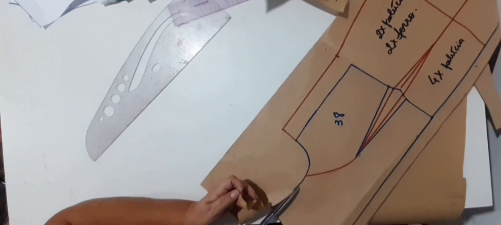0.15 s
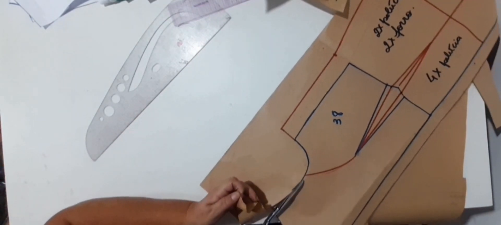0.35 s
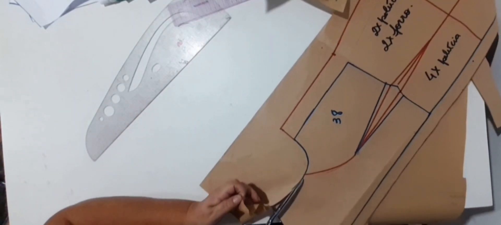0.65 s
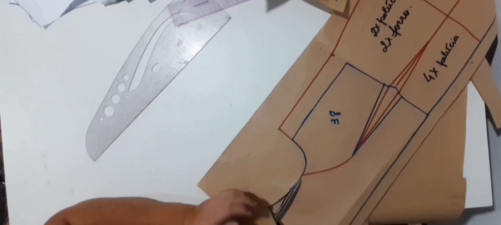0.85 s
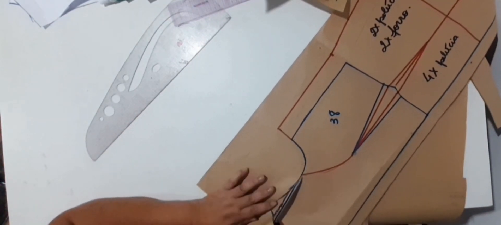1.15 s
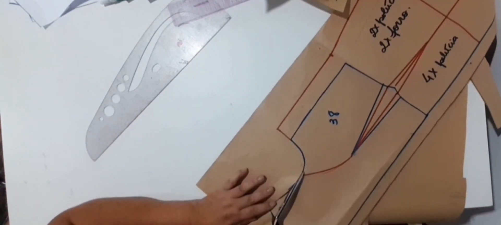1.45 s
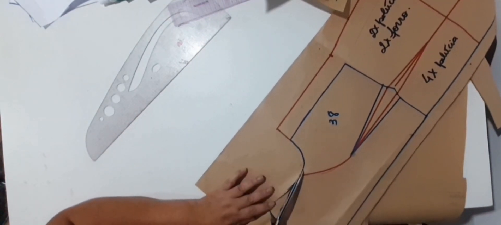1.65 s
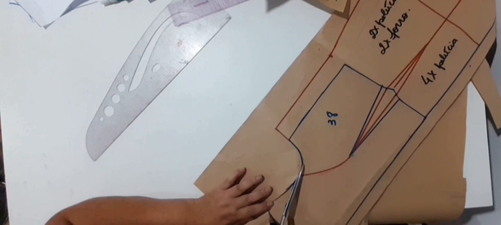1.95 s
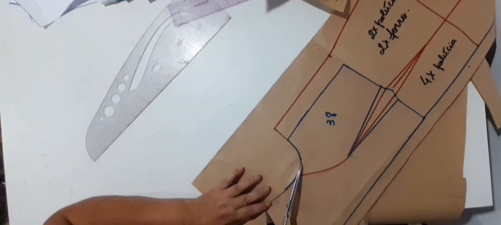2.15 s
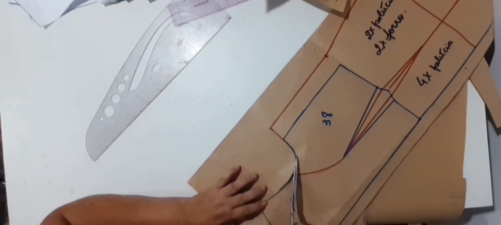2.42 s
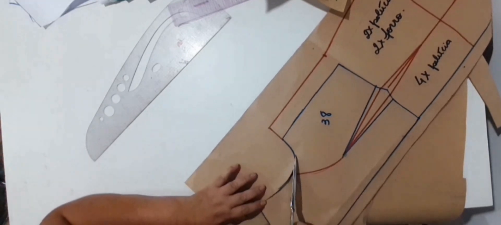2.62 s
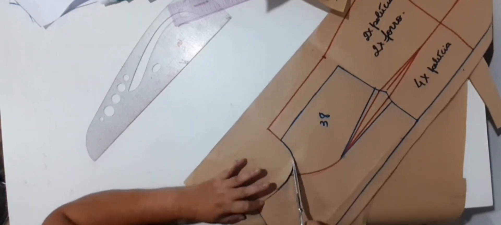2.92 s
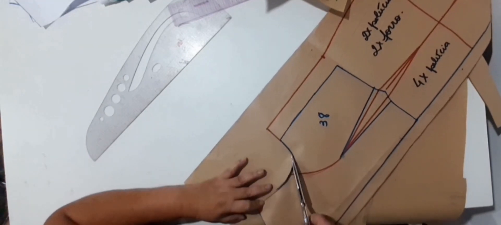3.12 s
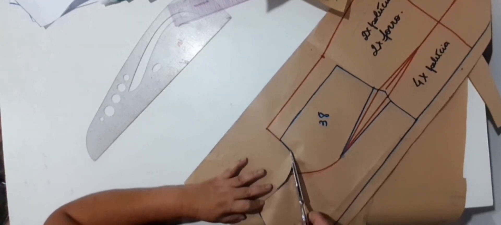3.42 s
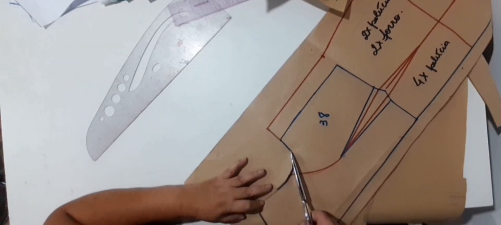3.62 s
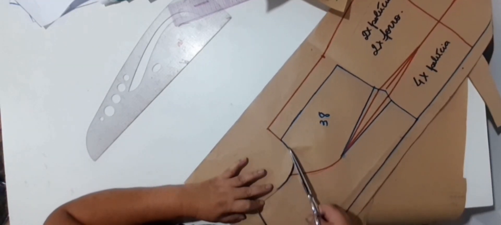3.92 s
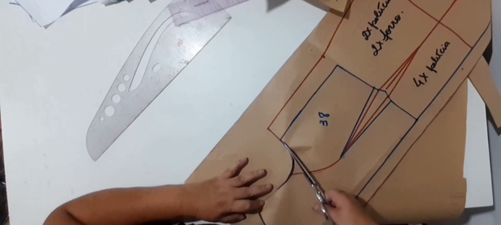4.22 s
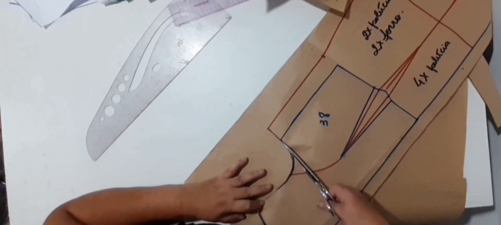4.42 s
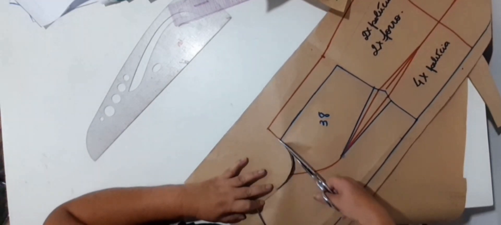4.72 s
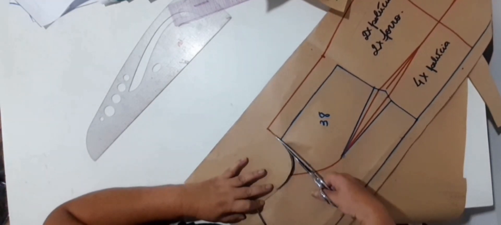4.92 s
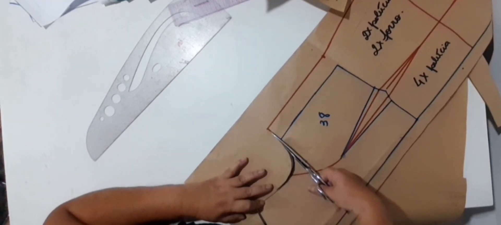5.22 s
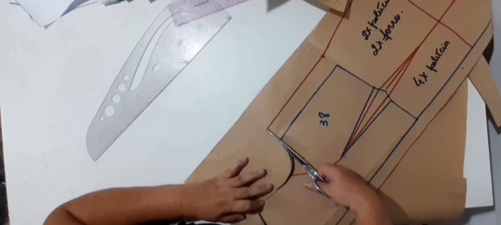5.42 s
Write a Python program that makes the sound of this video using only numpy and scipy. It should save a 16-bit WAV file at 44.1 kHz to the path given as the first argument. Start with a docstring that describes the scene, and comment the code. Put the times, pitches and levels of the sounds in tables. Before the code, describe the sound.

Large scissors cut stiff paper on a table, close to the microphone in a small room with faint low background noise. A soft slide of blades on paper leads to a first dry, crunchy cut at about 0.5 seconds. Light crinkles follow, and at 1 second a hand drops on the sheet with a soft thud and a brush. Crisp cuts come at about 1.4, 1.8 and 2 seconds. A louder scrape with sharp crackles at 2.3 seconds runs into a longer cut from 2.5 to 2.8. After another slide at 3 seconds, the lower blade rests on the table and the cuts sound fuller and more hollow: a quick run from 3.4 to 3.8, then others near 4.3, 4.9 and 5.4 seconds. Between them the blades slide along the paper with brief hissing rubs and small crinkles.

```python
"""Large scissors cutting stiff pattern paper on a table, close to a stereo microphone in a small room.
Each closing stroke snaps fibres in clumps, which sets the cut edge, the sheet and the table ringing.
Between strokes the blades open and slide on along the paper, and the sheet crinkles. Once the free hand
drops flat on it. The paper is lifted at first; later the lower blade rests on the table."""
import sys
import numpy as np
from scipy import signal
from scipy.fft import rfft, irfft
from scipy.io import wavfile
from scipy.ndimage import map_coordinates

SR = 44100
rng = np.random.default_rng(int(sys.argv[2]) if len(sys.argv) > 2 else 0)


def bounce(signal):
    """Save signal as a 16-bit WAV file at the path given by the first command-line argument."""
    frames = np.transpose(np.atleast_2d(signal))
    limited = np.clip(frames, -1, 1)
    pcm = np.round(limited * 32767).astype(np.int16)
    wavfile.write(sys.argv[1], SR, pcm)


N = 245005
TIME = np.arange(N) / SR
TAPS = 16384  # samples in an impulse response


def amp(db):
    """Decibels to gain."""
    return 10 ** (np.asarray(db) / 20)


def read(points, hz):
    """A table's value at hz, joined by straight lines on a log axis."""
    f, value = np.transpose(points)
    return np.interp(np.log(hz + 1), np.log(f + 1), value)


def through(x, response):
    """Convolves both streams with a response scaled to unit energy."""
    response = np.atleast_2d(response)
    return signal.oaconvolve(x, response / np.linalg.norm(response[0]), axes=1)[:, :N]


def colour(x, spectrum):
    """Causal filter shaped by (f/Hz, relative level/dB) points, so clicks keep their sharp front."""
    log_gain = np.log(amp(read(spectrum, abs(np.fft.fftfreq(TAPS, 1 / SR)))))
    minimum_phase = np.exp(np.conj(signal.hilbert(log_gain)))
    return through(x, np.fft.ifft(minimum_phase).real)


def ring(x, modes):
    """A body that answers each push with damped modes."""
    t = TIME[:TAPS]
    response = sum(amp(db) * width * np.exp(-np.pi * width * t) * np.cos(2 * np.pi * hz * t)
                   for hz, width, db in modes)
    return through(x, response)


def resonate(x, hz, width_hz):
    """A resonance of gain 1 that follows the curve hz."""
    turn = np.exp(2j * np.pi * np.cumsum(hz) / SR)
    pole = np.exp(-np.pi * width_hz / SR)
    return 2 * (turn * signal.lfilter([1 - pole], [1, -pole], x / turn)).real


def grains(per_s, spread_db, clump_db, clump_hz, smooth):
    """Tiny snaps of uneven size, in clumps, over smooth friction; two streams of unit power."""
    size = amp(spread_db * np.minimum(rng.exponential(1, N), 4)) * (rng.random(N) < per_s / SR)
    knots = rng.standard_normal(N).clip(-2, 2)
    clumps = amp(clump_db * np.interp(TIME * clump_hz, np.arange(N), knots))
    snaps = size / (size.std() + 1e-9) * rng.choice([-1, 1], (2, N))
    texture = clumps * (snaps + smooth * rng.standard_normal((2, N)))
    return texture / texture.std()


def swells(pushes):
    """Force over time of pushes that swell and let go."""
    force = np.zeros(N)
    for start, db, rise in pushes:
        progress = np.maximum(TIME - start, 0) / rise
        force += amp(db) * (progress * np.exp(1 - progress)) ** 2
    return force


def current(strokes):
    """For every moment, the time since the latest stroke began and that stroke's other columns."""
    rows = np.array(strokes)
    latest = np.maximum(np.searchsorted(rows[:, 0], TIME) - 1, 0)
    start, *columns = rows[latest].T
    return TIME - start, *columns


def effort(age, rise, fall, swell_db, sag_db, attack_s, stop_db_per_s):
    """A stroke of the hand makes contact, swells to its peak, sags, then stops."""
    contact = np.clip(age / attack_s, 0, 1)
    rising = np.clip(1 - age / rise, 0, 1)
    falling = np.clip((age - rise) / fall, 0, 1)
    stopped = np.maximum(age - rise - fall, 0)
    return contact * amp(-swell_db * rising - sag_db * falling - stop_db_per_s * stopped)


# the small room's background: f/Hz, relative level/dB
ROOM_TONE = [(20, -9), (35, -21), (55, 3), (80, -17), (110, 0), (200, -12), (450, -10), (1000, -19),
             (3000, -25), (8000, -28), (16000, -34)]

def room_tone():
    """Faint, steady, low noise behind the work at the table."""
    return amp(-71) * colour(rng.standard_normal((2, N)), ROOM_TONE)


# blades or hand sliding over the paper: t/s, rise/s, fall/s, rub level/dB, swell/dB, sag/dB,
# hiss/dB, drone/dB, hollow/dB (these three relative to the rub), hollow start f/Hz, hollow end f/Hz
SLIDES = [(0.0, 0.32, 0.055, -54, 3.1, 5, -3, 0, 2.5, 3260, 2500),
          (0.63, 0.093, 0.14, -62, 8, 7, 0.5, 2, -13, 3300, 3400),
          (0.9, 0.019, 0.1, -83, 4, -2.5, -7, 19.5, -18, 3500, 3500),
          (1.0, 0.057, 0.013, -52, 23, 10, 6, 8, 12, 3600, 3370),
          (1.085, 0.1, 0.17, -60, 3.2, 3.5, 1, -1.5, 13.5, 3570, 3100),
          (1.624, 0.08, 0.22, -61, 5, -1.5, 0, -0.5, 7.5, 3230, 3100),
          (1.91, 0.054, .02, -63, 14, 6, -1, 8, -9, 3200, 3100),
          (2.09, 0.14, .055, -58, 6.7, -3, 2, 1, -12, 2980, 2800),
          (2.25, 0.087, 0.053, -45, 10.5, 2.5, 2, -1.5, 3, 2500, 2330),
          (2.875, 0.17, 0.05, -58, 12.8, 0.5, 0.5, -1, 9.5, 2770, 2430),
          (3.115, 0.025, 0.16, -63, 1.8, 11, -3, -3.5, 15, 1960, 1820),
          (3.78, 0.2, .095, -58.5, 10.7, 7, 6, 3, 6, 2660, 2750),
          (4.52, 0.19, 0.081, -50.5, 21.5, 12, 5, 1, 13.5, 2580, 2670),
          (5.075, 0.17, 0.046, -55.5, 12, 3.5, 1.5, 2.5, 8, 2550, 2410)]
# the coarse and the fine part of the friction: f/Hz, relative level/dB
RUB_SPECTRUM = [(200, -21.5), (700, 0), (1100, -0.5), (1600, 3.5), (2100, 4), (2600, 4), (3700, 0.5),
                (4800, 3.5), (5800, -12), (7000, -9.5), (12000, -35)]
HISS_SPECTRUM = [(2500, -37.5), (5000, 0), (6500, 8.5), (7800, 9.5), (9800, -1.5), (11500, 2.5), (13000, 2),
                 (16000, -5.5)]
# the table's modes under a slide: f/Hz, width/Hz, relative level/dB
DRONE_MODES = [(107, 14, -6), (206.5, 105, -4), (350, 130, -6), (370, 120, -11.5), (427.5, 45, 0.5),
               (476.4, 7.8, -9.5)]

def sliding(hollow_width_hz):
    """Steel and skin drag over the paper's grain; the gap below rings and the table drones."""
    age, rise, fall, db, swell_db, sag_db, hiss_db, drone_db, hollow_db, from_hz, to_hz = current(SLIDES)
    pull = amp(db) * effort(age, rise, fall, swell_db, sag_db, attack_s=0.0048, stop_db_per_s=368)
    drag = pull * grains(per_s=3000, spread_db=2, clump_db=1.54, clump_hz=168.6, smooth=1)
    # the gap's pitch glides with the point of contact
    gap_hz = from_hz + (to_hz - from_hz) * np.clip(age / (rise + fall), 0, 1)
    hollow = resonate(drag * amp(hollow_db), gap_hz, hollow_width_hz)
    hollow = resonate(hollow, gap_hz, hollow_width_hz)
    hiss = colour(drag * amp(hiss_db), HISS_SPECTRUM)
    drone = ring(drag * amp(drone_db), DRONE_MODES)
    return colour(drag, RUB_SPECTRUM) + hollow + hiss + drone + creases(pull)


def creases(pull):
    """The dragged sheet creases now and then, with small dry cracks."""
    cracks = pull * grains(per_s=70, spread_db=4.5, clump_db=3.5, clump_hz=20, smooth=0)
    spectrum = [(300, -19), (1200, -1.5), (3300, -10), (7500, -0.5), (10000, -42), (13000, -19),
                (16000, 0)]
    return amp(-10) * colour(cracks, spectrum)


# sharp crinkles of the sheet, close to the microphone: t/s, level/dB, centre f/Hz, decay/s
CRINKLES = [(0.3172, -42, 2260, 0.0045), (0.7134, -49, 3490, 0.006), (0.8302, -49, 9200, 0.005),
            (0.989, -55, 3560, .0041), (1.0287, -46, 4000, 0.0025), (1.1274, -51, 4430, .0025),
            (1.176, -39, 3770, 0.00077), (1.1899, -38.5, 3870, 0.0011), (1.2462, -41, 3360, 0.0013),
            (1.6302, -43, 4020, 0.0014), (1.837, -34.5, 1730, 0.0019), (2.257, -42.5, 13400, .0027),
            (2.27, -33.5, 13400, 0.003), (2.288, -35, 12300, 0.0064), (2.3244, -30.5, 2480, 0.001),
            (2.3744, -30, 2430, 0.0027), (2.387, -35.5, 3600, 0.0021), (3.3, -48, 1810, 0.0022),
            (3.3855, -43, 6940, 0.0041), (3.7962, -45, 2600, 0.0033), (4.503, -49, 4740, .0038),
            (5.2712, -44, 3030, 0.0043)]

def crinkles(crack_db, low_db, high_db):
    """Each crinkle is one sharp crack and a burst dying in milliseconds, in a broad band of its own."""
    out = np.zeros((2, N))
    t = TIME[:2048]
    for start, db, hz, decay in CRINKLES:
        burst = np.exp(-t / decay) * rng.standard_normal((2, len(t)))
        burst[:, 0] += amp(crack_db) * rng.choice([-1, 1], size=2)
        tick = colour(amp(db) * burst, [(hz / 8, low_db), (hz / 2, -5), (hz, 0), (hz * 4, high_db)])
        slot = out[:, round(start * SR):][:, :tick.shape[1]]
        slot += tick[:, :slot.shape[1]]
    return out


# closing strokes, close to the microphone: t/s, rise/s, fall/s, crunch level/dB, sag/dB,
# then relative to the crunch: sheet/dB, table/dB, boom/dB, cut edge/dB
CUTS = [(0.435, 0.016, 0.15, -47, 11.5, -2.5, -5, -15.5, -5.5),
        (1.382, .004, 0.036, -53, 6.5, -11, -5.5, -25, -7),
        (1.426, 0.078, 0.033, -47, 4.5, -3.5, -8.5, -20, -0.5),
        (1.832, 0.024, 0.033, -48.5, 7, -18, -8, -14, -26),
        (1.982, 0.049, 0.036, -44.5, 6.5, -5, -5.5, -18, -43),
        (2.49, 0.089, .065, -51.5, 6.5, -2.5, -7.5, -13.5, -12.5),
        (2.703, 0.011, 0.073, -47.5, 13, -2.5, -1, -21, -11),
        (3.39, 0.016, 0.052, -54, -0.5, 5, 1.5, -12, -13),
        (3.497, 0.0099, 0.088, -47.5, 9.5, 5.5, 2.5, -15, -7),
        (3.669, .003, 0.12, -46.5, 15.5, -.5, 1, -10.5, -26),
        (4.294, 0.023, .145, -50.5, 17, 4, 1.5, -8.5, -11),
        (4.835, 0.047, 0.032, -52, 2.5, 3.5, 4.5, -5, 3.5), (4.932, 0.004, 0.041, -52, 5.5, 7, 8, -3.5, -8),
        (5.431, 0.043, 0.075, -52, 7.5, 8, 2.5, -6, 2.5)]
# clumps of fibres giving way: t/s, level/dB, rise/s
TEARS = [(0.4445, -44, 0.0018), (0.4518, -45.5, 0.0045), (0.5013, -44, 0.01), (0.5175, -62, 0.0015),
         (0.545, -42.5, 0.0085), (0.572, -44.5, 0.0082), (1.4265, -42.5, 0.0063), (1.4802, -50, 0.0016),
         (1.4955, -39.5, 0.0059), (1.5173, -42, 0.0052), (1.5346, -46, 0.0029), (1.984, -46.5, 0.0065),
         (2.0041, -43, 0.0023), (2.0226, -38, 0.0054), (2.4976, -47, 0.0052), (2.53, -37.5, 0.0038),
         (2.567, -37, 0.0049), (2.609, -40.5, .004), (2.68, -51, 0.0086), (2.7176, -40, 0.0068),
         (3.4066, -49, 0.0057), (3.5066, -41.5, 0.0012), (3.5473, -48, 0.0041), (3.672, -41, .0035),
         (3.697, -47, 0.0026), (3.7248, -42, .003), (3.759, -45.5, 0.0035), (4.343, -45.5, 0.0057),
         (4.368, -41.5, 0.0042), (4.4175, -49.5, 0.0066), (4.4556, -57, 0.0066), (4.9358, -53, 0.0062),
         (5.4794, -43.5, 0.001)]
# snapping fibres, with the paper lifted and with the blade resting: f/Hz, relative level/dB
LIFTED_SNAP = [(200, -19), (1000, 1), (1800, -2), (2300, -1.5), (2850, 0.5), (3700, -6), (5500, -9),
               (7500, -6), (9800, -18.5), (12800, -8.5), (16000, -19.5)]
RESTING_SNAP = [(200, -41), (1000, 4), (1900, -2.5), (2350, 8), (3000, -2), (3700, -2), (5500, -9),
                (7700, -0.5), (9800, -17), (12800, -1.5), (16000, -19)]
# modes of the cut edge (lifted, resting), the sheet and the table: f/Hz, width/Hz, relative level/dB
LIFTED_EDGE = [(2100, 39, 4), (2576, 190, 3), (2930, 110, -26), (2950, 70, 2), (3270, 26, -9)]
RESTING_EDGE = [(2322, 46, 11), (2417, 70, -6), (2570, 73, -31), (3040, 35, 11.5), (3110, 31, -44)]
SHEET_MODES = [(675.7, 56, 2.5), (779, 81, 4), (887, 36, 5), (880, 29, -41), (1202, 32, -5), (1286, 45, 1),
               (1349, 14, 5), (1507, 4, 1), (1588, 7.9, -7)]
TABLE_MODES = [(100.4, 26, -2.5), (148, 12, -23), (183.4, 9.9, -3.5), (213, 27, 4.5), (232.2, 54, 0.5),
               (336.5, 26.4, 3), (356, 37, -12), (406, 26.6, 4), (472.2, 11.7, 2)]

def cutting(when, snap_spectrum, edge_modes, bass_db):
    """Fibres snap under the closing blades and shake the cut edge, the sheet and the table below."""
    age, rise, fall, db, sag_db, sheet_db, table_db, boom_db, edge_db = current(CUTS)
    bite = effort(age, rise, fall, swell_db=11.5, sag_db=sag_db, attack_s=0.0091, stop_db_per_s=288)
    crunch = when * amp(db) * bite
    tears = when * swells(TEARS)
    fibres = grains(per_s=6000, spread_db=2, clump_db=-0.5, clump_hz=329, smooth=0.16)
    snaps = np.hypot(crunch, tears) * fibres
    load = np.hypot(crunch, 0.6 * tears) * fibres  # the heavy parts feel a sudden tear less
    edge = ring(snaps * amp(edge_db), edge_modes)
    sheet = ring(load * amp(sheet_db), SHEET_MODES)
    growth_db, closing_s = 8, 0.17  # the table takes more of the force as the blades close
    press = load * amp(growth_db * np.clip(age / closing_s, 0, 1))
    contact = [(180, bass_db), (330, 0)]  # a resting blade drives the table's low modes harder
    driven_modes = [(hz, width, level + read(contact, hz)) for hz, width, level in TABLE_MODES[2:]]
    table = ring(press * amp(table_db), driven_modes)
    boom = ring(press * amp(boom_db), TABLE_MODES[:2])  # the deepest two depend on where the blade stands
    return colour(snaps, snap_spectrum) + edge + sheet + table + boom


# scissors and fingers bumping the table, and the blades clacking as the scissors open fully: t/s, level/dB,
# rise/s
TABLE_BUMPS = [(.7135, -54, 0.0045), (1.837, -44.5, 0.0011), (1.877, -68, 0.0035)]
BLADE_KNOCKS = [(4.1835, -57.5, 0.002)]
# the steel's modes: f/Hz, width/Hz, relative level/dB
BLADE_MODES = [(1390, 540, 0), (1630, 340, -5.5), (2200, 180, 3), (2840, 350, -20)]

def knocks():
    """A short chatter of contact, muffled by the paper, rings the table or the blade."""
    chatter = colour(rng.standard_normal((2, N)), [(100, -2), (3000, 9), (6000, -11), (16000, -28)])
    table = ring(swells(TABLE_BUMPS) * chatter, TABLE_MODES)
    blade = ring(swells(BLADE_KNOCKS) * chatter, BLADE_MODES)
    return table + blade


# fingers and palm landing on the sheet: t/s, level/dB, rise/s
HAND_PATS = [(1.036, -65, 0.0047), (1.0455, -35, 0.0019), (1.0555, -34, 0.0012), (1.065, -33, 0.00173),
             (1.155, -47, 0.0055)]
# the table top's modes under the hand: f/Hz, width/Hz, relative level/dB
THUD_MODES = [(53, 2, 4), (77.4, 13, -13), (99.8, 6.5, 3), (123, 13, -8), (163, 30, 7), (195, 29, -5),
              (235.5, 31, 11.5), (335, 60, -6), (390, 45, 3)]

def hand(thud_db, slap_db):
    """Each soft blow of the hand pushes the table top; the paper slaps under it."""
    push = swells(HAND_PATS)
    thud = ring(np.array([push, np.zeros(N)]), THUD_MODES)  # in the mid stream, which both capsules share
    slap_spectrum = [(100, 14.5), (900, -2.5), (3500, -9.5), (9000, -16), (16000, -29)]
    slap = colour(push * rng.standard_normal((2, N)), slap_spectrum)
    return amp(thud_db) * thud + amp(slap_db) * slap


def flex(x, patchy_db, patch_hz, patch_s):
    """The sheet bends as it is handled, so its many high resonances come and go."""
    hz, t, spectra = signal.stft(x, SR, nperseg=512, noverlap=384)
    place = np.meshgrid(hz / patch_hz, t / patch_s, indexing="ij")
    fields = rng.standard_normal((2, 256, 256))
    patches = np.array([map_coordinates(field, place, order=1, mode="wrap") for field in fields])
    gain = amp(patchy_db * patches * np.minimum(hz / 1500, 1)[:, None])
    gain /= np.sqrt(np.mean(gain ** 2, axis=2, keepdims=True))
    return signal.istft(spectra * gain, SR, nperseg=512, noverlap=384)[1][:, :N]


# reverberation of the small room: f/Hz, time to fall by 60 dB/s
ROOM_T60 = [(100, 0.82), (450, 0.31), (900, 0.3), (1450, 0.42), (2100, 0.063), (4000, 0.22), (14000, 0.28)]

def room(x):
    """Sparse reflections of random sign follow after 5 ms and linger longest in the bass."""
    signs = rng.choice([-1., 1.], (2, TAPS))
    arrivals = (rng.random((2, TAPS)) < 3000 / SR) * (TIME[:TAPS] > 0.005)
    hz, t, spectra = signal.stft(signs * arrivals, SR, nperseg=256)
    decay = amp(-60 * t / read(ROOM_T60, hz)[:, None])
    return through(x, signal.istft(spectra * decay, SR, nperseg=256)[1])


# the stereo microphone close to the scissors: f/Hz, left-right likeness (-1 to 1)
MIC_LIKENESS = [(50, 1), (150, 0.75), (300, 0.97), (600, 0.54), (900, 0.4), (1400, -0.32), (2300, 0.66),
                (3500, 0), (5500, -0.15), (7200, 0.95), (9000, 0.77), (16000, .7)]
# its balance: f/Hz, left minus right level/dB
MIC_BALANCE = [(60, 2), (250, -1.5), (1000, -1.5), (2000, -0.5), (7500, -1.5), (8900, 4.5), (10500, -3),
               (13200, -8), (15800, -3)]

def microphone(x, lead_share):
    """Mid, which both capsules share, and side, which differs between them, become left and right."""
    hz = np.fft.rfftfreq(2 * N, 1 / SR)
    likeness = np.clip(read(MIC_LIKENESS, hz), -0.9, 0.99)
    mid, side = rfft(x, 2 * N)
    lead = lead_share / (1 + (hz / 5500) ** 4)  # below the treble the left capsule hears it first
    width = np.sqrt((1 - likeness) / (1 + likeness))
    side = (1j * lead * mid + np.sqrt(1 - lead ** 2) * side) * width
    lean = amp(read(MIC_BALANCE, hz) / 2)
    return irfft(np.array([(mid + side) * lean, (mid - side) / lean]))[:, :N]


def scene():
    """Scissors, paper and hand on the table close to the microphone, with the small room behind."""
    lifted = TIME < 3.0  # after this the lower blade rests on the table
    paper = cutting(lifted, LIFTED_SNAP, LIFTED_EDGE, bass_db=-9)
    paper += cutting(~lifted, RESTING_SNAP, RESTING_EDGE, bass_db=-6)
    paper += sliding(hollow_width_hz=1000)
    paper += crinkles(crack_db=10.5, low_db=-13, high_db=-18.5)
    near = flex(paper, patchy_db=4, patch_hz=199.7, patch_s=0.045)
    near += hand(thud_db=-9, slap_db=-5.5) + knocks()
    return microphone(near + room_tone() + amp(-11) * room(near), lead_share=0.54)


def record(dry):
    """The recorder's rumble filter at 40 Hz and band limit at 16.1 kHz."""
    rumble_filter = signal.butter(2, 40, "highpass", fs=SR, output="sos")
    band_limit = signal.firwin(511, 16100, window=("kaiser", 9), fs=SR)
    return signal.oaconvolve(signal.sosfilt(rumble_filter, dry), band_limit[None], "same")


dry = scene()
out = record(dry)
bounce(out)
```